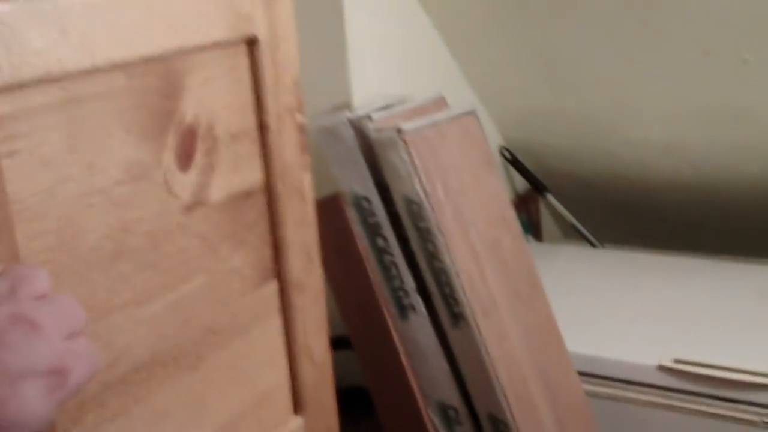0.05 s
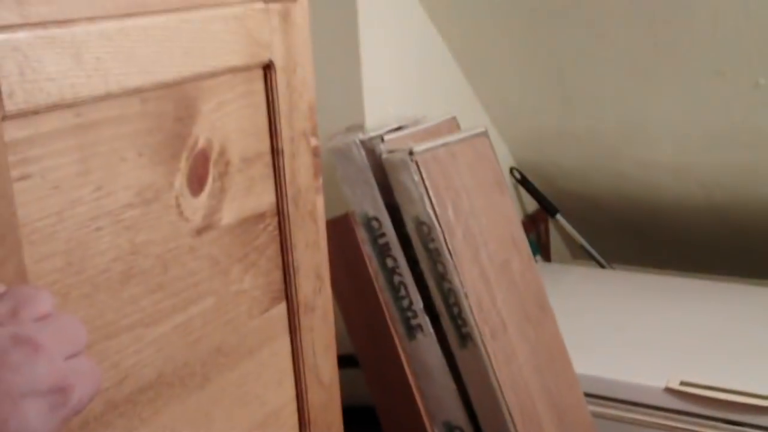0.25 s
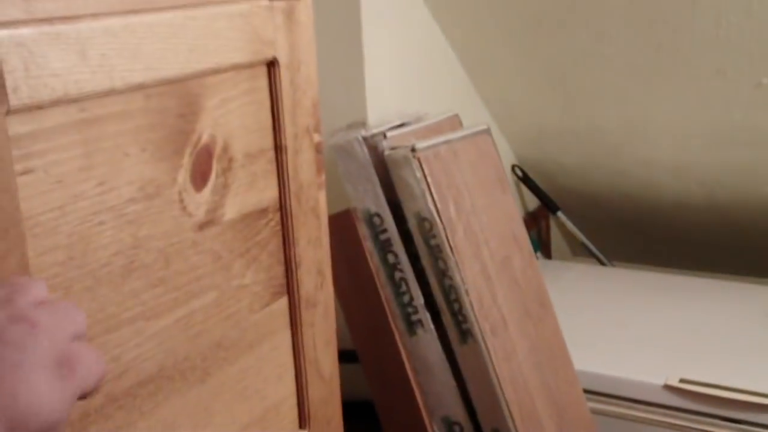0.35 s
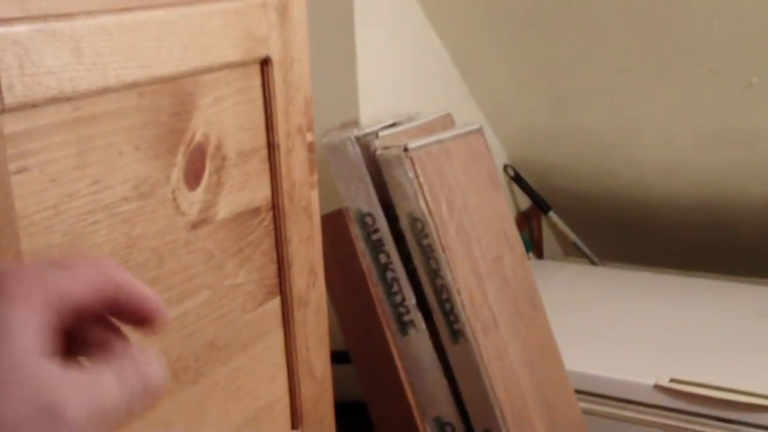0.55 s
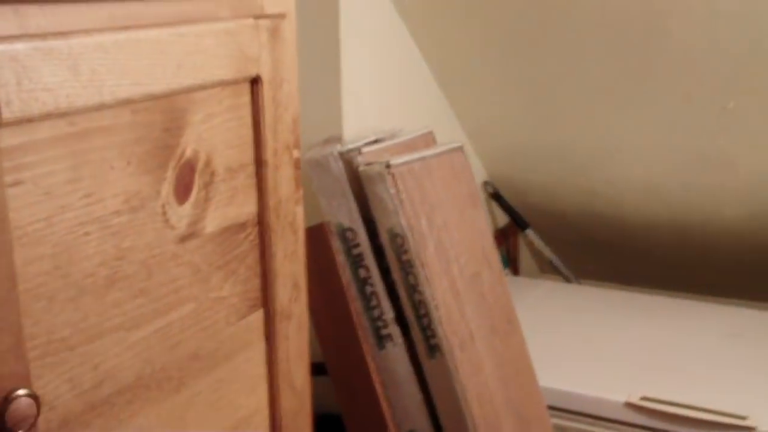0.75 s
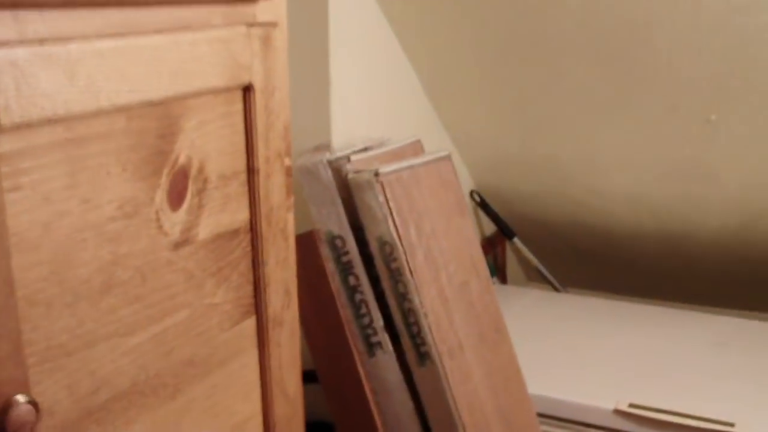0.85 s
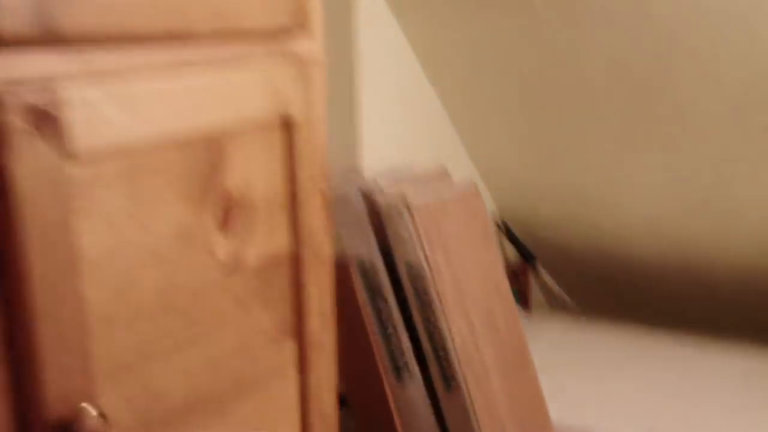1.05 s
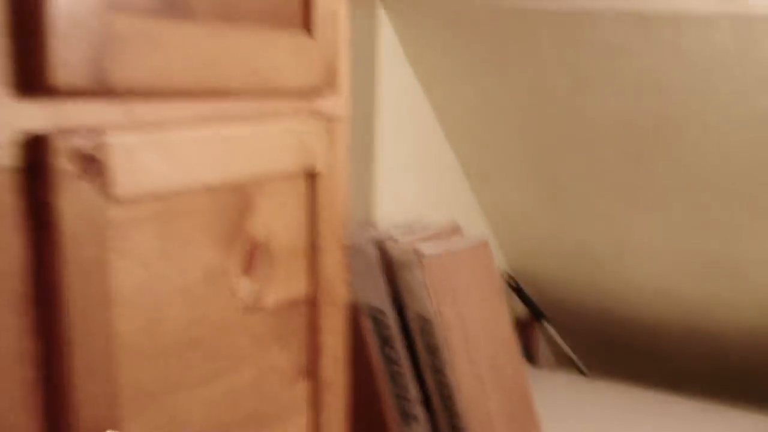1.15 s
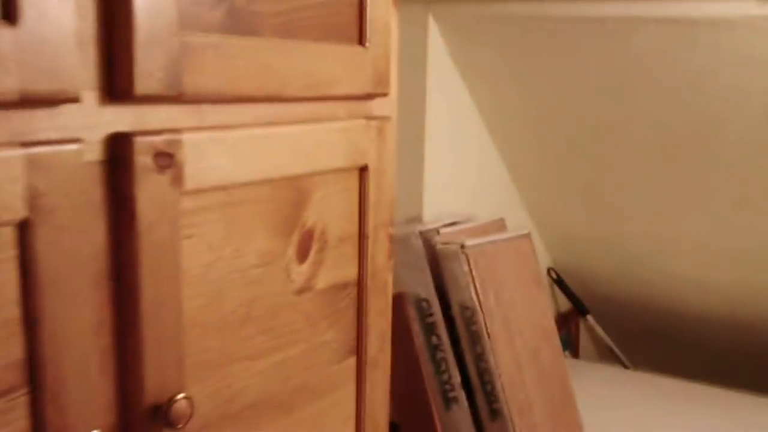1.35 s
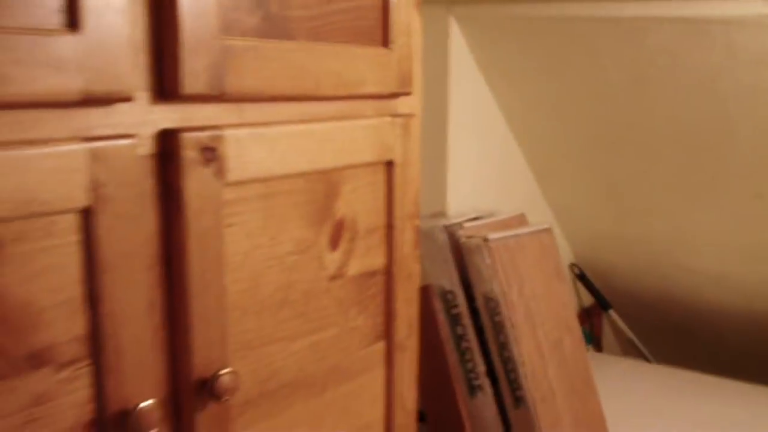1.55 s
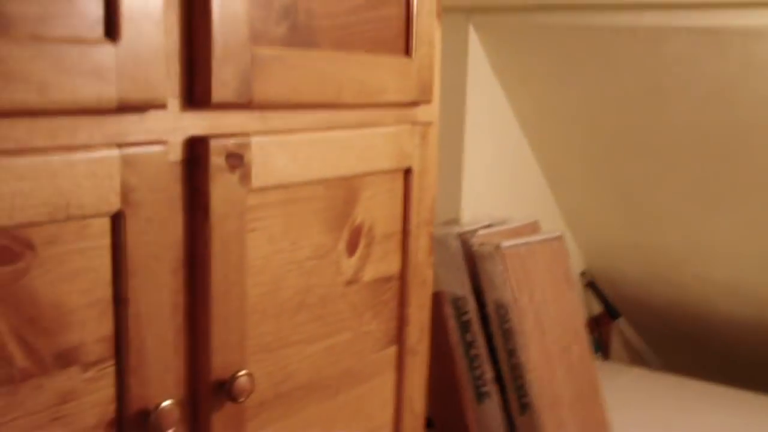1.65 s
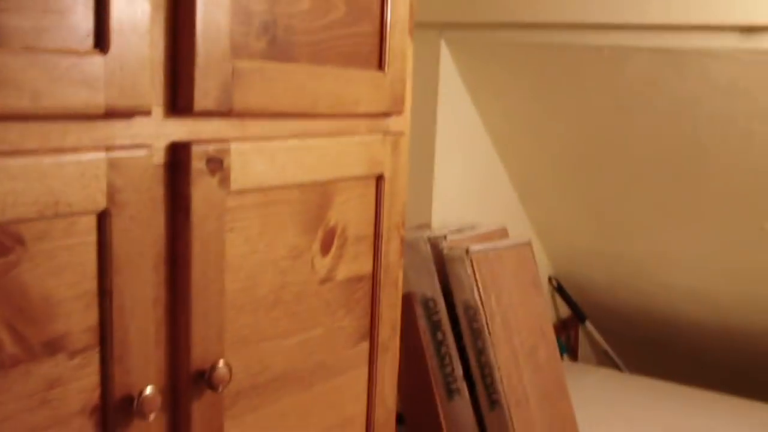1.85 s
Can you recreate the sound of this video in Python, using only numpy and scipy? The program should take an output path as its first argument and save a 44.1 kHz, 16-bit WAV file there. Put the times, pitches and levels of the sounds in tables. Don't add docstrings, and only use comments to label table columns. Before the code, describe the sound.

A wooden cabinet door is pushed shut close to a hand-held microphone, clapping and chattering with a catch snap and low boom; brief room reflections follow, then soft shoe scuffs over hiss and faint motor hum.

```python
import sys
import numpy as np
from scipy import signal
from scipy.fft import rfft, irfft, next_fast_len
from scipy.io import wavfile

SR = 44100
rng = np.random.default_rng(int(sys.argv[2]) if len(sys.argv) > 2 else 0)


def store_wav(level_fs):
    pcm = np.round(np.clip(np.atleast_2d(level_fs), -1, 1) * 32767)
    wavfile.write(sys.argv[1], SR, pcm.T.astype(np.int16))


def ratio_of_db(decibels):
    return 10 ** (np.asarray(decibels, float) / 20)


N = 83790


def rms_one(x):
    return x / np.sqrt(np.mean(x ** 2) + 1e-20)


def at_hz(points, hz):
    point_hz, value = np.array(points).T
    return np.interp(np.log(hz), np.log(point_hz), value)


def drift(rate_hz):
    r = np.exp(-80 * np.pi * rate_hz / SR)
    noise = rng.standard_normal(N // 40 + 2002)
    slow = signal.lfilter([1], [1, -2 * r, r * r], noise)[2000:]
    return np.interp(np.arange(N) / 40, np.arange(len(slow)), rms_one(slow))


def ring(x, hz, t60_s):
    r, w = ratio_of_db(-60 / (t60_s * SR)), 2 * np.pi * hz / SR
    return signal.lfilter([0, np.sin(w)], [1, -2 * r * np.cos(w), r * r], x + 1e-18)


def narrow(hz, width_hz):
    return rms_one(ring(rng.standard_normal(N), hz, 2.2 / width_hz))


def high_pass(x, hz):
    return signal.sosfilt(signal.butter(2, hz, "high", fs=SR, output="sos"), x)


def below(x, hz):
    size = next_fast_len(N)
    bin_hz = np.arange(size // 2 + 1) * SR / size
    return irfft(rfft(x, size) * (bin_hz < hz), size)[:, :N]


def bands(spectrum, side_db):
    edges = 20 * 2 ** np.arange(0, 9.9, 1 / 3)
    centres = np.sqrt(edges[1:] * edges[:-1])
    white = rng.standard_normal((2, 2, N + SR // 4))
    out = []
    for k, hz in enumerate(centres):
        band = signal.butter(2, edges[k:k + 2], "band", fs=SR, output="sos")
        mid, side = signal.sosfilt(band, white[k % 2])[:, -N:]
        side = ratio_of_db(at_hz(side_db, hz)) * side
        out.append(ratio_of_db(at_hz(spectrum, hz)) * (mid + side * [[1], [-1]]))
    return centres, np.array(out) / np.std(sum(out))


def struck_once(modes):
    out = np.zeros(N)
    for hz, db, t60_s, start_s in modes:
        click = np.zeros(N)
        click[int(start_s * SR)] = 1
        out += ratio_of_db(db) * ring(click, hz, t60_s)
    return out


# time in seconds, strength in dB, brightness of the contact in Hz.
CONTACTS = [
    (0.2046, -11.5, 5000),
    (0.2061, -2.5, 6000),
    (.2080, -2, 7000),
    (0.2137, -16, 3900),
    (.2185, -3, 2380),
    (0.2226, -4.5, 2500),
    (.2330, -5, 3000),
    (.2410, -7, 1500),
]
# frequency in Hz, level in dB, t60 in seconds.
PANEL = [(380.4, -4, 0.18), (454.4, -3, 0.18), (874, -13.5, 0.15), (1002, -11, 0.12), (1279, -9, 0.15),
         (1597, -3.5, 0.085), (2038, -6, 0.13), (2450, -4.5, 0.083), (3030, -3, 0.078), (3490, -11, 0.059),
         (4616, -7, 0.065)]


def panel():
    panel_db, strike_spread_db, rattle_db = -11.5, 4, 3.5
    out, luck = np.zeros(N), rng.standard_normal((len(CONTACTS), len(PANEL)))
    for m, (hz, db, t60_s) in enumerate(PANEL):
        clicks = np.zeros(N)
        for (s, hit_db, bright_hz), chance in zip(CONTACTS, luck[:, m]):
            clicks[int(s * SR)] = ratio_of_db(hit_db + strike_spread_db * chance) / np.hypot(1, hz / bright_hz)
        waver = ratio_of_db(panel_db + db + rattle_db * drift(22.4))
        out += (-1) ** m * waver * ring(clicks, hz, t60_s)
    return out


# frequency in Hz, level in dB, t60 in seconds, start in seconds.
REBOUND = [
    (430, -9.5, 0.061, .2125),
    (749.6, -7, 0.1, .2085),
    (776, -7, 0.14, .2165),
    (1107, -8, 0.092, .2195),
    (1729, -12.5, .13, .2290),
]


def rebound():
    return -struck_once(REBOUND)


# frequency in Hz, level in dB, t60 in seconds, start in seconds.
BOX = [
    (58.8, -25.5, 0.59, .212),
    (93.9, -13, 0.31, .2095),
    (122.2, -7, 0.27, .2095),
    (148.4, -10.5, .28, .2095),
    (187.6, -18.5, 0.3, .211),
    (239.6, -20, 0.34, .215),
    (294, -21.5, 0.17, .24),
    (112.2, -23, 0.4, .2405),
]


def box():
    return -struck_once(BOX)


def door():
    return high_pass(panel() + rebound() + box(), 42)


# frequency in Hz, level in dB per Hz.
CLAP = [(88, -14), (200, -15.5), (430, -5), (600, -15), (800, -10.5), (1670, -13), (4720, -16),
        (15000, -32)]
# frequency in Hz, t60 in seconds.
CLAP_T60 = [(200, 0.37), (700, 0.23), (2000, 0.23), (5000, 0.19), (12000, 0.15)]
# frequency in Hz, dB under the sum.
CLAP_SIDE_DB = [(150, -27), (600, -24), (1200, -17), (2000, -43), (3300, -48), (4300, -18.5), (5600, -22),
                (7000, -47)]


def clap():
    clap_s, clap_db, rise_s, rise_cycles, uneven_db = .2055, -7.5, 0.00079, 5.6, 1
    late_db, late_t60_s = -31.5, 0.73
    crack_db, crack_rise_s, crack_t60_s, crack_from_hz = 1, 0.0012, 0.045, 2300
    now, out = np.arange(N) / SR, 0
    t = np.maximum(now - clap_s, 0)
    cracks = []
    for s, hit_db, _ in CONTACTS:
        age = np.maximum(now - s, 0)
        fade = ratio_of_db(crack_db + hit_db - 60 * age / crack_t60_s)
        cracks.append((1 - np.exp(-age / crack_rise_s)) * fade)
    for hz, noise in zip(*bands(CLAP, CLAP_SIDE_DB)):
        rise = 1 - np.exp(-t / (rise_s + rise_cycles / hz))
        early = ratio_of_db(uneven_db * drift(52) - 60 * t / at_hz(CLAP_T60, hz))
        late = ratio_of_db(late_db - 60 * t / late_t60_s)
        crack = sum(c / np.hypot(1, hz / bright_hz) for c, (_, _, bright_hz) in zip(cracks, CONTACTS))
        crack = crack / np.hypot(1, (crack_from_hz / hz) ** 2)
        out = out + noise * (rise * (early + late) + crack)
    return ratio_of_db(clap_db) * out


# frequency in Hz, level in dB, t60 in seconds.
CATCH = [
    (3397, -5, .035),
    (2700, -3, 0.017),
    (4366, -15.5, 0.043),
]
CATCH_S = [
    .2058,
    .2078,
    .2105,
    .2135,
]


def catch():
    clicks = np.zeros(N)
    clicks[(np.array(CATCH_S) * SR).astype(int)] = ratio_of_db(-2.5 * np.arange(len(CATCH_S)))
    return sum(ratio_of_db(db) * ring(clicks, hz, t60_s) for hz, db, t60_s in CATCH)


# start in seconds, length in seconds, rub in dB, rub in Hz, hiss in dB.
SCUFFS = [(0.096, 0.082, -59, 460, -77), (0.433, 0.022, -52.5, 736, -56), (0.944, 0.098, -54.5, 1110, -54),
          (1.086, 0.053, -53.5, 1810, -52), (1.126, 0.061, -49.5, 930, -54.5), (1.28, 0.04, -77, 1680, -46),
          (1.328, 0.075, -55.5, 566, -52), (1.492, 0.06, -53.5, 730, -63), (1.518, 0.054, -49, 890, -45),
          (1.559, 0.014, -50, 2700, -50.5), (1.61, 0.026, -53, 576, -52), (1.781, 0.051, -44, 1010, -46),
          (1.812, 0.032, -48.5, 1440, -56), (1.87, 0.074, -50.5, 1780, -53)]
# frequency in Hz, level in dB per Hz.
SCUFF_HISS = [(300, -12), (1000, 2.5), (2000, -1.5), (4000, -3), (9000, -5.5), (13000, -8.5)]
# frequency in Hz, dB under the sum.
SIDE_DB = [(60, -24), (200, -33), (700, -17.5), (1400, -18), (2400, -37), (4500, -15), (6500, -29),
           (13000, -22)]


def scuffs():
    attack_s, release_s, rub_q = 0.018, 0.065, 8
    t, out = np.arange(N) / SR, 0
    hiss = sum(bands(SCUFF_HISS, SIDE_DB)[1]) * ratio_of_db(0.69 * drift(40))
    hollow = ratio_of_db(-6) * narrow(551, 80)
    for s, length_s, rub_db, hz, hiss_db in SCUFFS:
        swell = np.clip((t - s) / attack_s, 0, 1)
        fade = np.exp(-np.maximum(t - s - length_s, 0) / release_s)
        rub = narrow(hz, hz / rub_q) + hollow
        out = out + swell * fade * (ratio_of_db(rub_db) * rub + ratio_of_db(hiss_db) * hiss)
    return out


# frequency in Hz, level in dB per Hz.
AIR = [(12, -45), (20, -9), (146, -3.5), (197, -10), (314, -9), (556, -15.5), (751, -17.5), (909, -18),
       (13500, -22)]


def air():
    return ratio_of_db(-46) * sum(x * ratio_of_db(0.72 * drift(10.4)) for x in bands(AIR, SIDE_DB)[1])


# frequency in Hz, width in Hz, level in dB.
HUM = [
    (108, 8.8, -75),
    (139.4, 3.5, -62.5),
]


def motor():
    level = ratio_of_db(-55 + 3.5 * drift(4.1))
    pitch_hz = 233.5 + 2.46 * drift(2.9)
    tone = level * np.sin(2 * np.pi * np.cumsum(pitch_hz) / SR)
    return tone + sum(ratio_of_db(db) * narrow(hz, width_hz) for hz, width_hz, db in HUM)


def scene():
    return door() + clap() + catch() + scuffs() + air() + motor()


def band_limit(x):
    return signal.sosfilt(signal.butter(12, 15570, fs=SR, output="sos"), x)


OFFSET = [
    [-.002],
    [.00085],
]


def record(dry):
    cutoff_hz, step_hz, step_db, full_scale = 13600, 10400, -4, 1.0
    flicker_low_hz, flicker_high_hz = 11300, 12700
    x = high_pass(below(dry, cutoff_hz), 25)
    mid = x.mean(axis=0)
    x = x - mid + np.clip(mid, -full_scale, full_scale)
    low, kept = below(x, step_hz), below(x, cutoff_hz)
    splatter = x - kept
    weak = below(x, flicker_high_hz) - below(x, flicker_low_hz)
    flicker = ratio_of_db(-4 + 2.5 * drift(130))
    top = kept - low + (flicker - 1) * weak + splatter
    mix = np.clip(low + ratio_of_db(step_db) * top + OFFSET, -full_scale, full_scale)
    return band_limit(mix)


dry = scene()
out = record(dry)
store_wav(out)
```